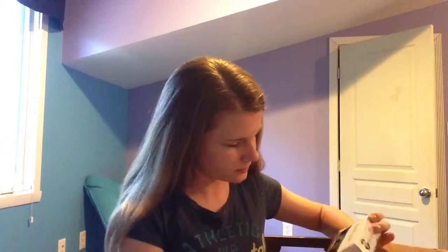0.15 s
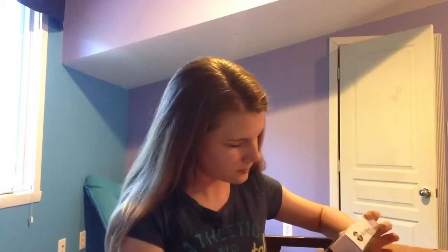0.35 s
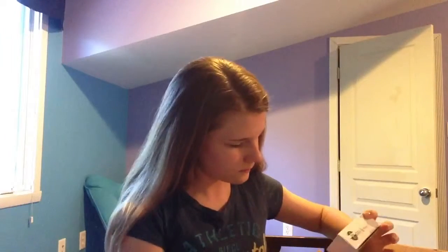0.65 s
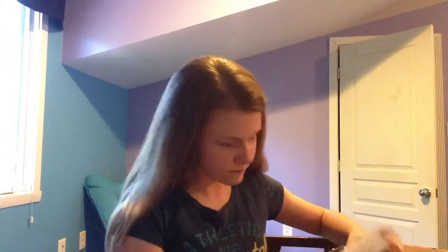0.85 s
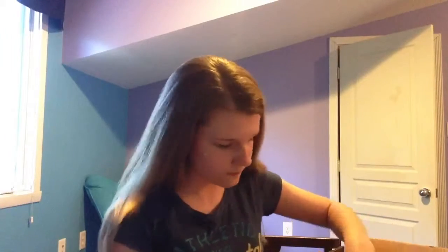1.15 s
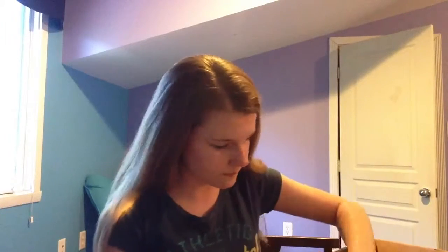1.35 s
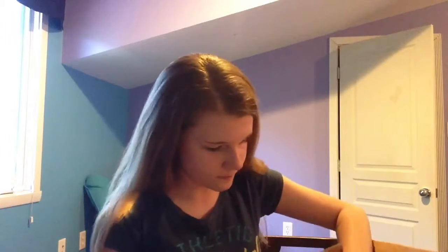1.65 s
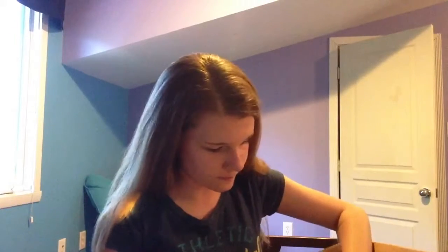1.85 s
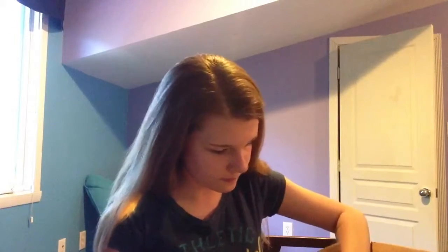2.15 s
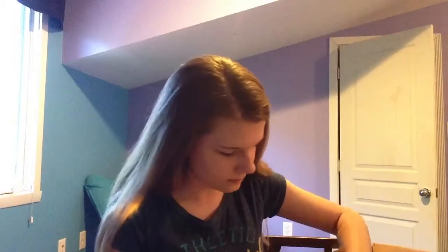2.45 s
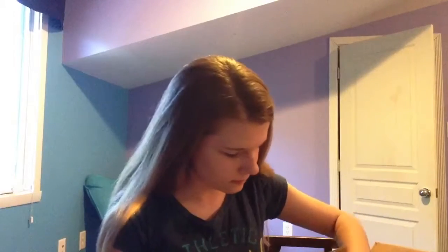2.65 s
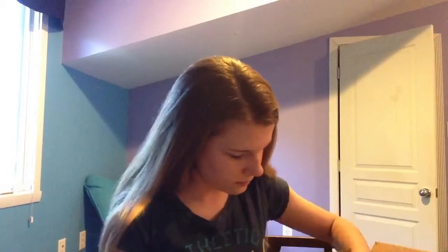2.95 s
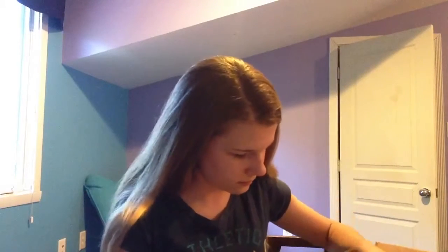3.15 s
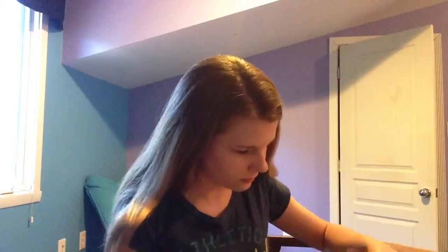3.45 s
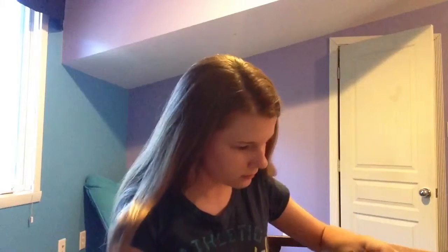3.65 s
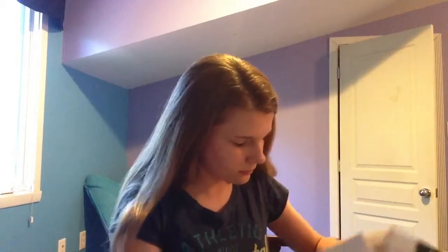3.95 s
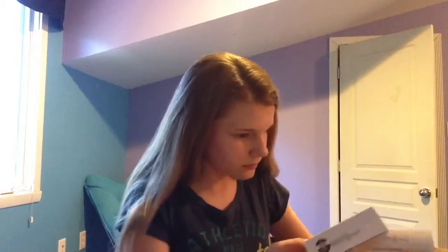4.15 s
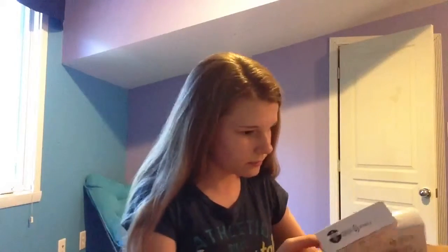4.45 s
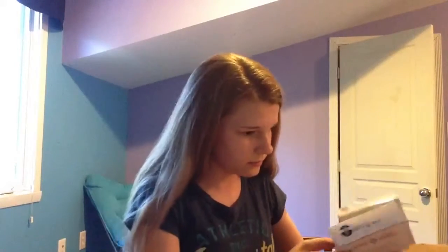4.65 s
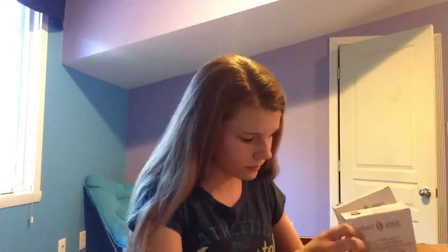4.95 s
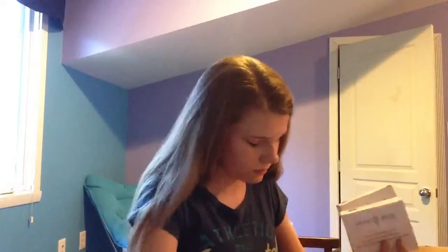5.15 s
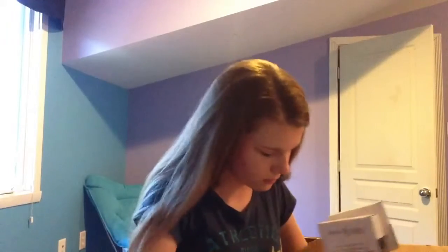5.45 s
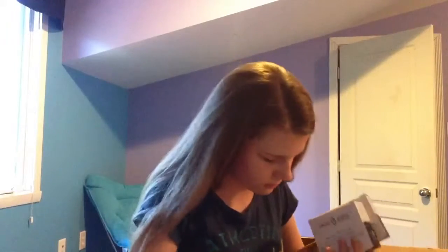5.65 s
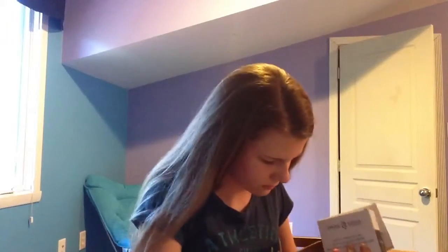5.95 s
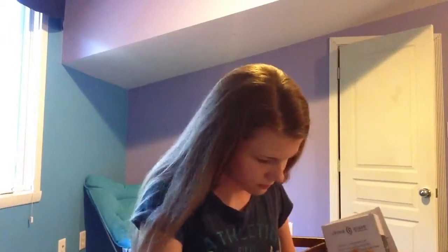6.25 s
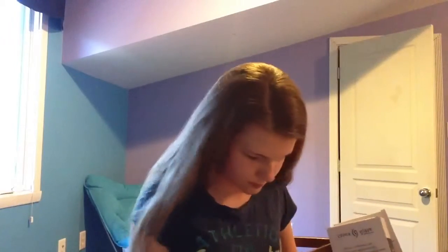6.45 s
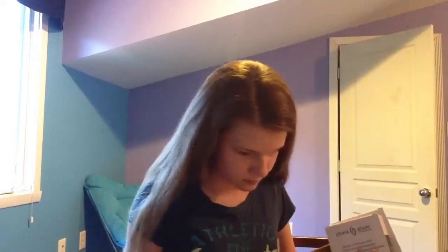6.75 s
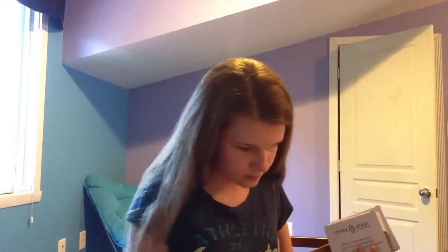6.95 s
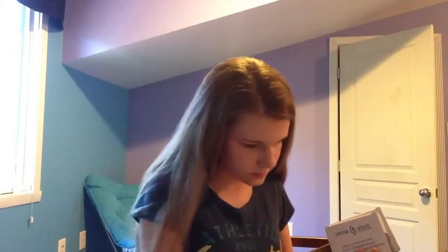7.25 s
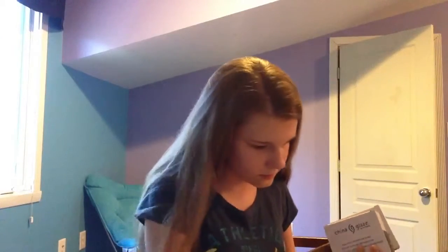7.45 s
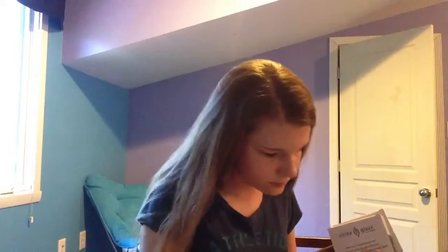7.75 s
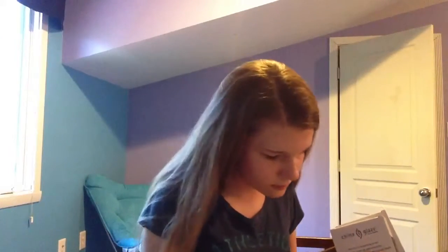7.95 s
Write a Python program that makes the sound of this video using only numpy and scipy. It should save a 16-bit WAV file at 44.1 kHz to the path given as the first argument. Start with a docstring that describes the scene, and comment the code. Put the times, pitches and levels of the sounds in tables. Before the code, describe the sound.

Crisp foam rustling comes in uneven bursts, broken by hollow cardboard slides and knocks, then grows louder and busier over a faint indoor fan hum.

```python
"""In a small room, hands dig through a cardboard box of foam packing peanuts and handle a little carton.
Foam pieces crackle and squeak past each other, rub on the cardboard and patter on the box walls: random
stick-slip clicks, filtered into each material and made louder or softer by the hand movements.
Slides, scuffs, taps, foam rustles and soft bumps come in between, from ringing filters and shaped noise.
A faint fan hum of wavering sine tones lies under it, with filtered noise for the air."""
import sys
import numpy as np
from scipy import signal
from scipy.fft import rfft, irfft
from scipy.io import wavfile
from scipy.ndimage import uniform_filter1d

SR = 44100
rng = np.random.default_rng(int(sys.argv[2]) if len(sys.argv) > 2 else 0)


def generate_wav(signal):
    """Clip the signal to [-1, 1] and save it as 16-bit WAV at the path in sys.argv[1]."""
    frames = np.transpose(np.atleast_2d(signal))
    scaled = np.clip(frames, -1, 1) * 32767
    pcm = np.round(scaled).astype(np.int16)
    wavfile.write(sys.argv[1], SR, pcm)


N = 356769
T = np.arange(N) / SR  # time in seconds

# tone colour of foam: pitch_hz [Hz], level_db [dB]
FOAM_COLOUR = [(200, -40), (500, -9), (1500, -25), (2600, -2), (3300, -4.5), (4500, -3), (5600, 2.5),
               (6050, 2), (6650, -1), (8600, 0.5), (10000, 3), (11500, 0.5), (13500, 3), (15500, -5)]
# tone colour of cardboard: pitch_hz [Hz], level_db [dB]
CARDBOARD_COLOUR = [(150, -37.5), (450, -2), (650, 1), (900, -1.5), (1250, -0.5), (1600, -4.5), (1950, 0),
                    (2800, -4.5), (3300, -9), (4000, -3), (4600, -5.5), (7000, -9.5), (15000, -28)]
# ringing pitches of the small carton: pitch_hz [Hz], width_hz [Hz], level_db [dB]
CARTON_MODES = [(906, 57, -11), (1173, 220, 3.5), (1514, 270, 0), (1994, 106, -6.5), (2754, 200, -7.5)]


def undb(db):
    """Turn decibels into gain."""
    return 10 ** (np.asarray(db) / 20)


def unit(x):
    """Scale to an rms (average strength) of 1."""
    return x / np.sqrt(np.mean(x ** 2))


def add(out, start_s, sound):
    """Mix a sound in at a start time."""
    start = max(int(start_s * SR), 0)
    out[start:start + len(sound)] += sound[:N - start]


def colour(x, points):
    """Filter through (Hz, dB) points; folding the cepstrum makes the filter act only after its input."""
    hz, db = np.transpose(points)
    freq = np.maximum(np.fft.rfftfreq(4096, 1 / SR), 1)
    curve_db = np.interp(np.log(freq), np.log(hz), db)
    cepstrum = irfft(np.log(undb(curve_db)))
    cepstrum[1:] *= 2
    cepstrum[len(cepstrum) // 2:] = 0
    response = irfft(np.exp(rfft(cepstrum)))
    return signal.fftconvolve(x, response)[:len(x)]


def resonance(x, hz, width_hz):
    """Ring at one pitch, with gain 1 at the centre; a narrower width rings longer."""
    return signal.lfilter(*signal.iirpeak(hz, hz / width_hz, fs=SR), x)


def flutter(rate):
    """Smooth random wandering with a spread near 1; rate is in new values per second."""
    steps = rng.standard_normal(N // 20)
    return np.interp(T * rate, np.arange(len(steps)), steps)


def slips(rate, spread_db, size, shiver_s=0.011, click_db=-4):
    """Stick-slip clicks at random moments, most small and a few large; each leaves a brief noisy shiver."""
    happens = rng.random(size) < rate / SR  # rate is in slips per second
    strength = undb(spread_db * np.minimum(rng.exponential(size=size), 4))
    clicks = happens * strength * rng.choice([-1, 1], size) / np.sqrt(rate)
    energy = signal.lfilter([1], [1, -np.exp(-1 / (shiver_s * SR))], clicks ** 2)
    shiver = np.sqrt(energy) * rng.standard_normal(size)
    return unit(undb(click_db) * unit(clicks) + unit(shiver))


def patchy(x, depth_db):
    """Each piece that comes into play rings at its own pitches for a moment: random patches of loudness."""
    spectrum = signal.stft(x, nperseg=512)[2]
    patches = rng.standard_normal(spectrum.shape)
    patches = uniform_filter1d(patches, size=6, axis=0)  # smooth across pitch
    patches = uniform_filter1d(patches, size=3, axis=1)  # smooth across time
    return signal.istft(spectrum * undb(depth_db * unit(patches)))[1][:len(x)]


def stroke(t, rise_s, t60):
    """Loudness of a contact that builds up quickly, then falls by 60 dB in t60 seconds."""
    return np.minimum(t / rise_s, 1) * np.exp(-np.log(1000) * np.maximum(t - rise_s, 0) / t60)


def moves(rows, attack_s, release_s, arch_db):
    """Gain of hand movements: each takes hold, runs on with its middle arched or dipped, then settles."""
    power = np.zeros(N)
    for start_s, length_s, swell_db, level_db in rows:
        t = T[:int((length_s + release_s) * SR)]
        way = np.minimum(t / length_s, 1)  # 0 at the start of the movement, 1 at its end
        arch = arch_db * (np.sin(np.pi * way) - .5)
        hold = undb(level_db + swell_db * (way - .5) + arch)
        attack = np.minimum(t / attack_s, 1)
        settle = np.exp(-np.log(1000) * np.maximum(t - length_s, 0) / release_s)
        add(power, start_s, (attack * hold * settle) ** 2)
    return np.sqrt(power) + 1e-9


def sliding():
    """Gain of hands and cartons sliding over bare cardboard, dipping in the middle of each slide."""
    # slides: start_s [s], length_s [s], swell_db from start to end [dB],
    # level_db before the swell and dip [dB]
    slide_rows = [(0.0, 0.13, -11, -71.5), (0.85, 0.17, 6, -66), (1.02, 0.26, 2, -63.5),
                  (3.835, 0.11, 1, -60.5), (4.02, 0.094, 2.5, -55.5), (4.33, 0.36, -9.5, -65),
                  (4.685, 0.15, -5, -64), (4.92, 0.29, 3.5, -64), (6.625, 0.064, 1, -58),
                  (7.03, 0.12, 2, -60)]
    return moves(slide_rows, attack_s=0.021, release_s=0.57, arch_db=-6.0)


def digging(column, attack_s, release_s, arch_db):
    """Gain that the hand's sweeps give to one of their sounds: "crackle", "rubbing" or "wall"."""
    # sweeps through the filling: start_s [s], length_s [s], swell_db from start to end [dB],
    # crackle_db, rubbing_db and wall_db before the swell, arch and trims [dB]
    sweeps = [(1.275, 0.17, 0.5, -51, -56, -67.5), (1.423, 0.069, 3, -48.5, -53, -66),
              (1.528, 0.05, 0.5, -46, -51.5, -52), (1.632, 0.061, -6, -50, -50, -55),
              (1.683, 0.064, 2.5, -46, -49, -62), (1.781, 0.17, -0.5, -50.5, -52, -61.5),
              (2.044, 0.38, -4, -65, -58, -83), (2.355, 0.2, -2.5, -56, -57, -64),
              (2.55, 0.089, -1, -50.5, -54, -62), (2.674, 0.32, -1.5, -52, -51.5, -57),
              (3.039, 0.3, -5.5, -60.5, -56.5, -63.5), (3.402, 0.48, -12, -72, -74.5, -77.5),
              (5.304, 0.049, 5, -39.5, -42, -42.5), (5.422, 0.09, 9.5, -41.5, -46.5, -47.5),
              (5.651, 0.25, 3.5, -46, -51.5, -56), (5.925, .17, 6, -48, -55.5, -62.5),
              (6.14, 0.086, -1, -48.5, -54, -65), (6.293, 0.12, 8.5, -65, -61.5, -70),
              (6.746, .21, 7, -49.5, -51.5, -74.5), (7.173, 0.08, 0.5, -43.5, -49.5, -52),
              (7.248, 0.13, 0, -42, -46.5, -50), (7.406, 0.12, 6, -47.5, -50, -75),
              (7.506, 0.21, 0, -40.5, -44.5, -48), (7.735, 0.33, -6.5, -50, -55, -63)]
    place = {"crackle": 3, "rubbing": 4, "wall": 5}[column]
    rows = [(*sweep[:3], sweep[place]) for sweep in sweeps]
    return moves(rows, attack_s, release_s, arch_db)


def stirring(nudge_db=-13):
    """How hard the foam is stirred: by the sweeps, and faintly by every slide."""
    sweeps = digging("crackle", attack_s=0.02, release_s=0.4, arch_db=-0.5)
    return np.hypot(sweeps, undb(nudge_db) * sliding())


def lumps(rate, catch_db, settle_s):
    """Uneven heap: now and then a clump catches the hand, gives way and settles; a gain with rms 1."""
    catches = (rng.random(N) < rate / SR) * rng.exponential(size=N)  # rate is in catches per second
    surges = signal.lfilter([1], [1, -np.exp(-1 / (settle_s * SR))], catches)
    return unit(np.sqrt(1 + undb(catch_db) ** 2 * surges))


def background(air_db=-71.27, hum_db=-2, waver_db=3):
    """Still air as filtered noise, with a faint fan hum of sine tones that waver in loudness."""
    # tone colour of the air: pitch_hz [Hz], level_db [dB]
    air_colour = [(30, -17), (75, -19.5), (130, -7.5), (200, -4.5), (300, -3.5), (420, -7.5), (550, -14.5),
                  (1200, -15), (2500, -19), (6000, -17.5), (11000, -17.5), (15000, -18.5)]
    # fan hum: pitch_hz [Hz], level_db before the wavering and the trim hum_db [dB]
    hum_tones = [(130, -89), (140, -87), (280, -81.5), (420, -87)]
    hum = np.zeros(N)
    for hz, db in hum_tones:
        hum += undb(db + waver_db * flutter(2.8)) * np.sin(2 * np.pi * hz * T)
    air = unit(colour(rng.standard_normal(N), air_colour)) * undb(air_db)
    return air + np.sqrt(2) * undb(hum_db) * hum


def room(x, wet_db=-7, t60=0.32, damp_hz=6000, low_hz=250, size=2048):
    """The dull, short tail of a small room: fading noise echoes whose pattern keeps changing."""
    t, wet = T[:SR // 3], np.zeros(N)
    # overlapping slices of sound, each with its own random tail
    window = signal.windows.cosine(2 * size)
    for start in range(0, N - 2 * size, size):
        noise = rng.standard_normal(len(t))
        tail = signal.lfilter(*signal.butter(1, damp_hz, fs=SR), noise) * stroke(t, 0.003, t60)
        piece = x[start:start + 2 * size] * window
        add(wet, start / SR, signal.fftconvolve(piece, tail / np.linalg.norm(tail)))
    wet = signal.lfilter(*signal.butter(1, low_hz, "highpass", fs=SR), wet)  # light walls soak up the bass
    return (x + undb(wet_db) * wet) / np.hypot(1, undb(wet_db))


def bumps(rise_s=0.00777, breadth=0.41, rattle_db=-4, level_db=-2):
    """A soft blow swings one panel of the box, and the loose filling shudders with it."""
    # bumps: start_s [s], level_db before the trim level_db [dB], pitch_hz [Hz], fade_s [s]
    bump_rows = [(1.491,-49.5,325,0.1), (1.543,-52,355,0.084), (1.918,-57,290,0.083),
                 (3.891,-51.5,220,0.15), (4.844,-51.5,325,0.28), (4.849,-53,226,0.17),
                 (5.161,-49.5,334,0.4), (5.214,-44,295,0.14), (5.252,-45,315,0.1), (5.447,-42,302,0.08),
                 (5.559,-54,99,0.14), (6.653,-45,195,0.081), (6.68,-50.5,330,0.08), (7.646,-42.5,367,0.22)]
    out, t = np.zeros(N), T[:SR // 2]
    for start_s, db, hz, fade_s in bump_rows:
        shudder = rng.standard_normal(len(t))
        shudder = unit(resonance(resonance(shudder, hz, breadth * hz), hz, breadth * hz))
        panel = np.sqrt(2) * np.sin(2 * np.pi * hz * t)
        bump = (panel + undb(rattle_db) * shudder) * stroke(t, rise_s, fade_s)
        add(out, start_s - rise_s / 2, bump * undb(db + level_db))
    return out


def carton(rate=1500, spread_db=3, jerk_db=4.5, level_db=-1):
    """Sliding makes the small carton sing: friction clicks ring its modes in a narrow, hollow hiss."""
    friction = slips(rate, spread_db, size=N)
    ring = sum(undb(db) * resonance(friction, hz, width) for hz, width, db in CARTON_MODES)
    song = unit(colour(ring, CARDBOARD_COLOUR))
    return song * undb(jerk_db * flutter(40)) * sliding() * undb(level_db)


def taps(focus_db=9, chatter_db=1, chatter_s=0.055, detune=0.025, level_db=1):
    """A fingertip or loose piece hits the carton and chatters; the struck spot favours some of its modes."""
    # dry taps: start_s [s], peak_db before the trim level_db [dB], pitch_hz favoured by the spot [Hz]
    tap_rows = [(0.944,-54.5,1130), (0.959,-47,2010), (1.009,-44.5,2600), (1.069,-49,2320), (2.194,-46,885),
                (3.316,-45,2220), (3.484,-45.5,1080), (3.516,-53,1210), (3.563,-44.5,1510),
                (3.643,-52.5,1300), (4.667,-46,2700), (4.742,-46,2730), (4.812,-43,2440), (4.846,-36,990),
                (5.059,-43,2730), (5.089,-45.5,1200)]
    out, t = np.zeros(N), T[:SR // 8]
    for start_s, db, spot_hz in tap_rows:
        chatter = rng.standard_normal(len(t)) * stroke(t, 0.0036, chatter_s)
        contact = signal.unit_impulse(len(t)) + undb(chatter_db) * chatter / np.linalg.norm(chatter)
        ring = np.zeros(len(t))
        for hz, width, mode_db in CARTON_MODES:
            gain = undb(mode_db - focus_db * abs(np.log2(hz / spot_hz))) / np.sqrt(width)
            detuned_hz = hz * (1 + detune * rng.standard_normal())
            ring += gain * resonance(contact, detuned_hz, width)
        tap = resonance(ring, spot_hz, spot_hz / 2)  # a soft contact, with no hard edge
        top_hz = np.clip(2 * spot_hz, 500, 9000)
        tap = signal.sosfilt(signal.butter(2, top_hz, fs=SR, output="sos"), tap)
        add(out, start_s, tap / np.abs(tap).max() * undb(db + level_db))
    return out


def scuffs(rate=3000, spread_db=2, rise_s=.007, fade_s=0.077, board_db=-12, patchy_db=2.0, level_db=0):
    """Short bursts of friction; the touched spot sets the pitch, and the whole board sounds faintly too."""
    # fingers and cartons scuffing cardboard: start_s [s], level_db [dB], pitch_hz [Hz],
    # breadth [width as a share of the pitch]
    scuff_rows = [(0.046,-59,750,1.2), (0.105,-54.5,1700,1.2), (1.015,-49.5,1090,1.8), (1.568,-44,1590,1.5),
                  (1.655,-44,840,.4), (1.785,-47,1180,0.6), (2.208,-55,920,0.29), (2.408,-34,2200,2.3),
                  (3.106,-45.5,730,0.72), (3.28,-50,950,1.2), (3.322,-51,1600,0.13), (3.889,-39,1500,1.7),
                  (3.96,-40,1260,1.5), (4.109,-38.5,1600,3.3), (4.133,-38,1210,0.76),
                  (4.266,-45.5,1540,1.4), (4.3,-47.5,1150,0.87), (4.68,-57,2300,0.8),
                  (4.847,-39.5,1290,3.8), (5.159,-48,2400,1.25), (5.315,-36,1150,0.84),
                  (5.724,-39.5,2580,0.26), (5.785,-42,2050,.25), (5.932,-42.5,950,0.64),
                  (6.401,-40.5,1680,1.3), (6.44,-54,1780,0.44), (6.64,-56,1490,1.7), (6.87,-41.5,2270,0.6),
                  (7.192,-39,1430,7.6), (7.28,-37,830,0.47)]
    out, t = np.zeros(N), T[:SR // 3]
    for start_s, db, hz, breadth in scuff_rows:
        friction = patchy(slips(rate, spread_db, size=len(t)), patchy_db)
        board = colour(friction, CARDBOARD_COLOUR)
        spot = resonance(resonance(board, hz, breadth * hz), hz, breadth * hz)
        burst = unit(unit(spot) + undb(board_db) * unit(board))
        add(out, start_s - rise_s / 2, burst * stroke(t, rise_s, fade_s) * undb(db + level_db))
    return out


def foam_rustles(rate=4000, spread_db=2, patchy_db=3, level_db=0):
    """Foam rustles in a bright run of slips, as a jam lets go or, faintly, as a bump shakes the filling."""
    # foam pieces that jam and give way, and, in the faint rows (below -50 dB), loose filling
    # shaken by a bump: start_s [s], level_db [dB], rise_s [s], fade_s [s]
    rustle_rows = [(1.897,-37,0.0046,0.084), (2.424,-25.5,0.0061,0.025), (4.11,-59,0.0058,0.14),
                   (4.845,-57,0.0054,0.22), (5.154,-59.5,0.0034,0.63), (5.334,-41,0.033,0.15),
                   (6.657,-60,0.0042,0.91), (7.328,-34.5,0.008,0.1), (7.648,-31.5,0.0088,0.092),
                   (7.712,-34,0.0045,0.033)]
    out, t = np.zeros(N), T[:SR // 3]
    for start_s, db, rise_s, fade_s in rustle_rows:
        run = patchy(slips(rate, spread_db, size=len(t)), patchy_db)
        burst = unit(colour(run, FOAM_COLOUR))
        add(out, start_s - rise_s / 2, burst * stroke(t, rise_s, fade_s) * undb(db + level_db))
    return out


def box_walls(rate=500, spread_db=3, low_hz=170, level_db=1):
    """The shifting heap patters on the box and rings its panels and cavity."""
    # ringing pitches of the big box: pitch_hz [Hz], width_hz [Hz], level_db [dB]
    box_modes = [(228, 34, -10.5), (298, 15, -4.5), (317, 19, 3), (352.7, 15.4, 6.5), (487, 19, 1),
                 (542, 11, -2.5), (658, 33, -4.5), (799, 31, -1.5)]
    patter = slips(rate, spread_db, size=N)
    ring = sum(undb(db) * resonance(patter, hz, width) for hz, width, db in box_modes)
    ring = signal.sosfilt(signal.butter(2, [low_hz, 1500], "bandpass", fs=SR, output="sos"), ring)
    return unit(ring) * digging("wall", attack_s=0.044, release_s=0.41, arch_db=2.0) * undb(level_db)


def rubbing(rate=900, spread_db=4.0, jerk_db=2.5, wander_db=3.0, focus_db=7, squeak_db=-8,
            centre_hz=1400, slide_db=-6, level_db=-1):
    """Friction on cardboard, its colour wandering with the touched spot; single pieces squeak briefly."""
    sweeps = digging("rubbing", attack_s=0.037, release_s=0.45, arch_db=-0.5)
    force = np.hypot(sweeps, undb(slide_db) * sliding())
    alone = force / (force + stirring())  # one finger rings one spot; many peanuts ring them all
    rub = np.zeros(N)
    for hz in np.geomspace(650, 4400, 10):
        octaves_away = np.abs(np.log2(hz / centre_hz))
        emphasis_db = wander_db * flutter(18) - focus_db * alone * octaves_away
        friction = slips(rate, spread_db, size=N)
        band = resonance(resonance(friction, hz, hz / 2.9), hz, hz / 2.9)
        rub += band * undb(emphasis_db)
    rub = unit(colour(rub, CARDBOARD_COLOUR)) * undb(jerk_db * flutter(50))

    squeaks, t = np.zeros(N), T[:SR // 20]
    for when, pitch, size, glide in rng.random((600, 4)):
        hz = 700 * 4.2 ** pitch * (1 + 3 * (glide - .5) * t)
        squeak = np.sin(2 * np.pi * hz * t) * stroke(t, 0.0021, 0.014)
        add(squeaks, when * T[-1], undb(5.2 * size) * squeak)
    squeaks = unit(colour(squeaks, CARDBOARD_COLOUR))
    return (rub + undb(squeak_db) * squeaks) * force * undb(level_db)


def foam_squeaks(count=620, slip_hz=700, glide=0.5, short_s=0.006, long_s=0.028, low_hz=1900,
                 high_hz=11000, breadth=0.17, spread_db=11, level_db=-7):
    """One piece drags across another: a short, gliding run of slips rings the piece at its own pitch."""
    out = np.zeros(N)
    for when, length, speed, bend, pitch, size in rng.random((count, 6)):
        way = np.linspace(0, 1, int(SR * (short_s + length * (long_s - short_s))))
        slip_rate = slip_hz * 2 ** (2 * speed - 1 + glide * (2 * bend - 1) * way)
        slip_count = np.floor(np.cumsum(slip_rate) / SR)
        pulses = np.diff(slip_count, prepend=0) * np.sin(np.pi * way)
        pulses = np.pad(pulses, (0, SR // 200))  # room to ring on
        hz = min(low_hz * (high_hz / low_hz) ** pitch, SR / 3)
        ring = resonance(resonance(pulses, hz, breadth * hz), hz, hz / 2)
        squeak = ring / (ring.std() + np.finfo(float).eps)
        add(out, when * T[-1], squeak * undb(spread_db * size ** 2))
    return unit(colour(out, FOAM_COLOUR)) * stirring() * undb(level_db)


def peanuts(rate=1000, spread_db=2.5, jerk_db=0.55, patchy_db=1.0, gentle_db=-50, dull_hz=8000,
            level_db=-0.68):
    """Foam crackle: harder stirring gives more slips, gentle stirring duller ones."""
    stir = stirring()
    effort = np.clip(stir / undb(gentle_db), .2, 6)
    clicks = patchy(slips(rate * effort, spread_db, size=N), patchy_db)
    clicks = clicks * undb(jerk_db * flutter(70))
    soft = signal.lfilter(*signal.butter(1, dull_hz, fs=SR), clicks)
    crispness = effort / (effort + 1)
    crackle = soft + crispness * (clicks - soft)
    return unit(colour(crackle, FOAM_COLOUR)) * stir * undb(level_db)


def scene():
    """All the handling sounds in the room over the background, the same on both channels."""
    heap = peanuts() + foam_squeaks() + rubbing() + box_walls()
    heap = heap * lumps(rate=26, catch_db=-5, settle_s=0.0096)
    handling = heap + carton() + scuffs() + taps() + foam_rustles() + bumps()
    mono = room(handling) + background()
    return np.array([mono, mono])


def record(dry, low_hz=95, top_hz=15500):
    """The microphone thins out the bass and the recorder cuts the top."""
    thin = signal.sosfilt(signal.butter(2, low_hz, "highpass", fs=SR, output="sos"), dry)
    return signal.sosfiltfilt(signal.ellip(10, .05, 50, top_hz, fs=SR, output="sos"), thin)


dry = scene()
out = record(dry)
generate_wav(out)
```